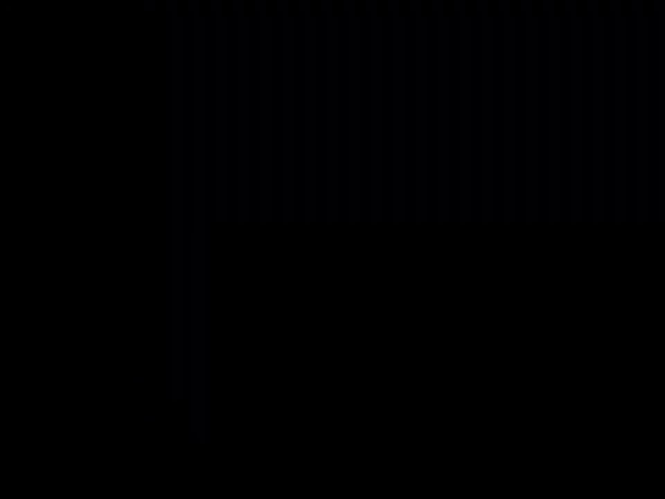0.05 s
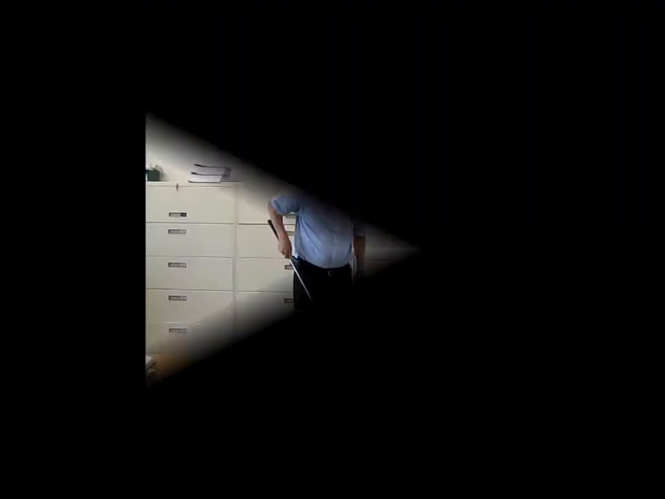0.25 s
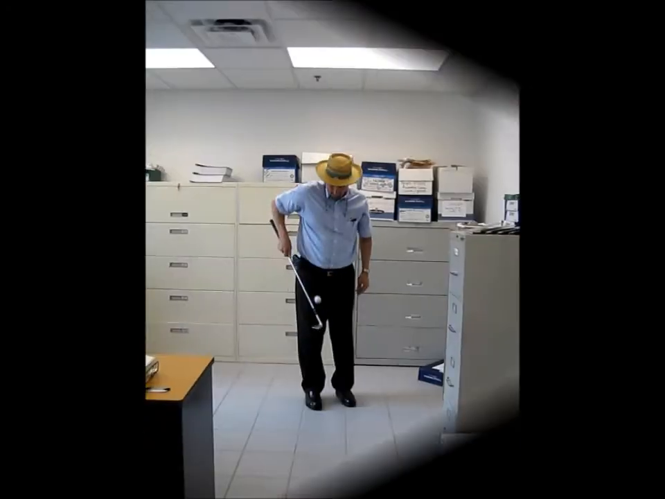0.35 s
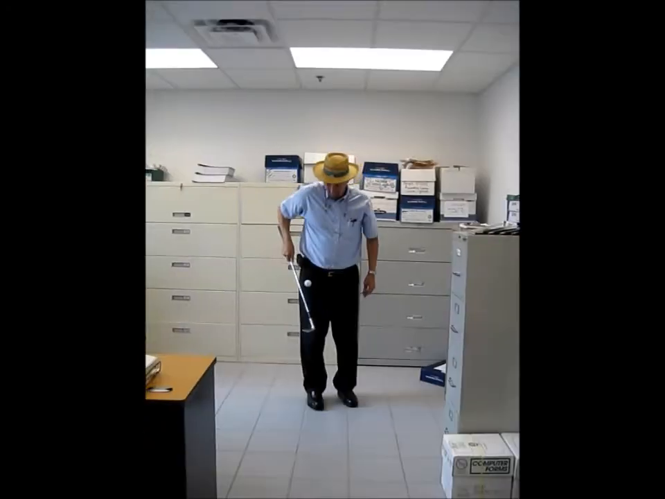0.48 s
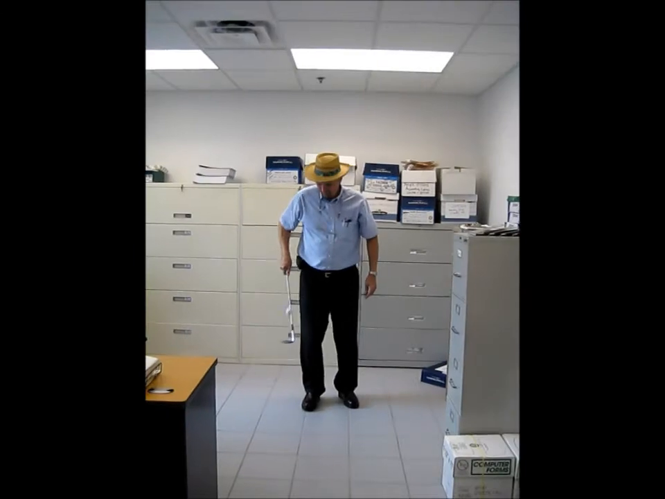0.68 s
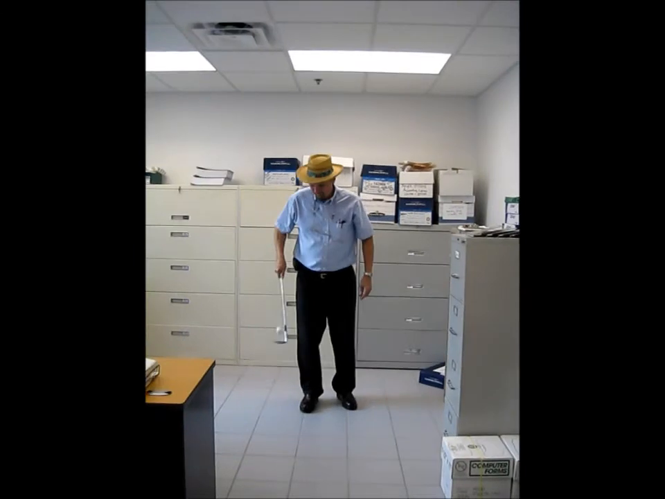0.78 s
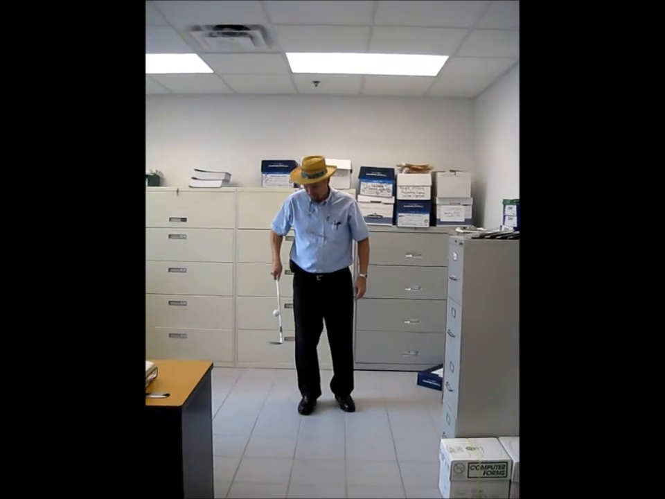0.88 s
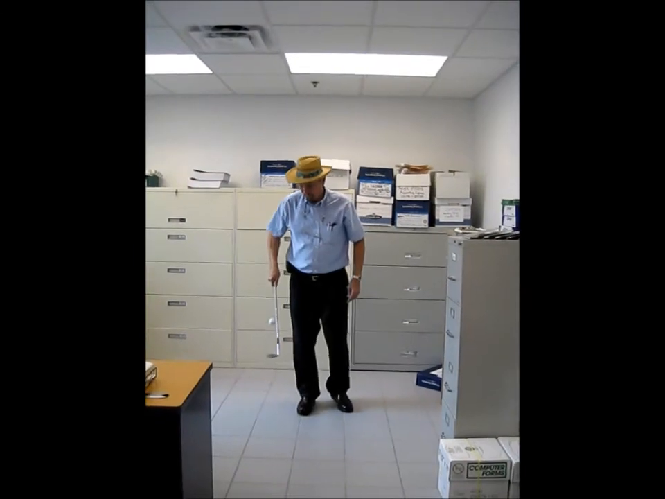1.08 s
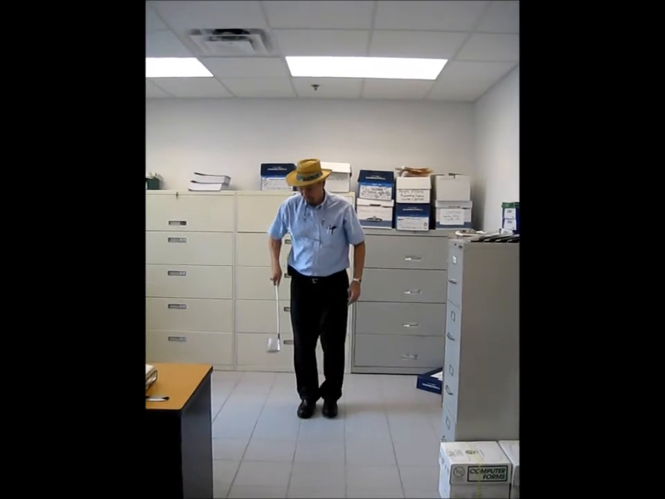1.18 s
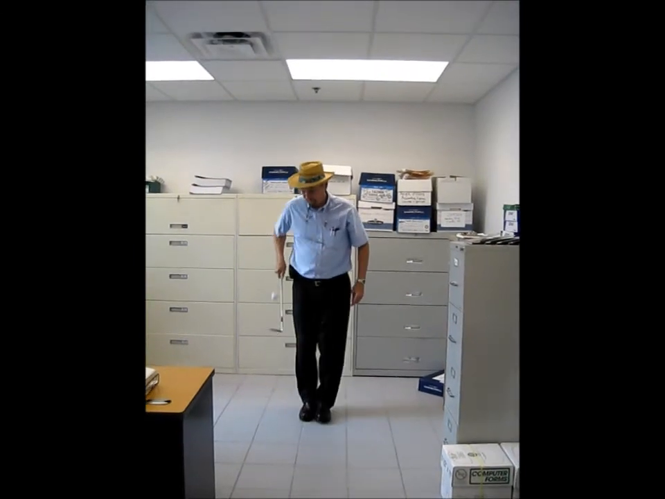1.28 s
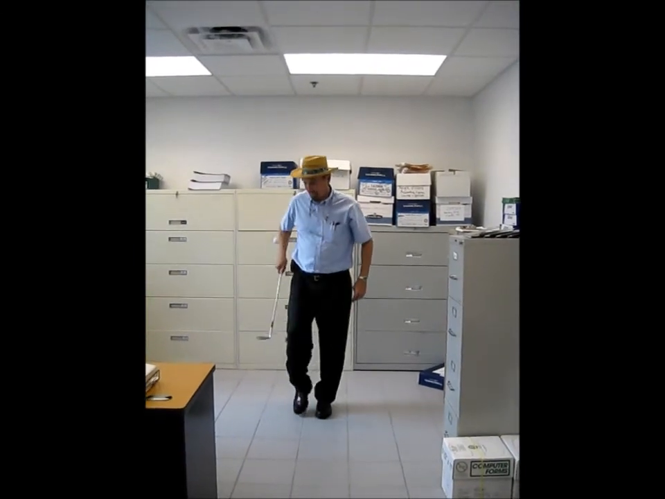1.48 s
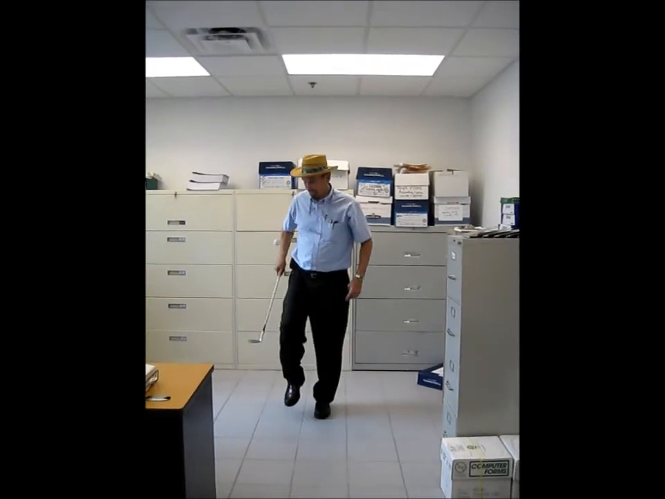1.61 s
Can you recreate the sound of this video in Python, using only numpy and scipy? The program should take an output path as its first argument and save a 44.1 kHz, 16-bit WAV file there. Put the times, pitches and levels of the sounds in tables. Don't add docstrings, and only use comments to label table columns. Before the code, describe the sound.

Three sharp clicks of a golf ball tapped on an iron club in a tiled office

```python
import sys
import numpy as np
from scipy import signal
from scipy.fft import rfft, irfft, next_fast_len
from scipy.io import wavfile
from scipy.ndimage import uniform_filter1d

SR = 44100
rng = np.random.default_rng(int(sys.argv[2]) if len(sys.argv) > 2 else 0)


def attenuation_scalar(level_db):
    decades = np.asarray(level_db, float) / 20
    return 10 ** decades


def unload_audio(sound):
    columns = np.transpose(np.atleast_2d(sound))
    steps = np.round(np.clip(columns, -1, 1) * 32767)
    wavfile.write(sys.argv[1], SR, steps.astype(np.int16))


N = 72765
T = np.arange(N) / SR


def unit(x):
    return x / np.sqrt(np.mean(x ** 2))


def shape(x, gain):
    size = next_fast_len(len(x) + 4096)
    hz = np.maximum(np.arange(size // 2 + 1) * SR / size, 1)
    return irfft(rfft(x, size) * gain(hz), size)[:len(x)]


def read(table, hz):
    points = np.array(table)
    return np.interp(np.log(hz), np.log(points[:, 0]), points[:, 1])


def band(x, hz, width_hz):
    return signal.lfilter(*signal.iirpeak(hz, hz / width_hz, fs=SR), x)


def walk(rate_hz):
    k = int(SR / rate_hz)
    steps = np.repeat(rng.standard_normal(N // k + 1), k)
    return 1.05 * uniform_filter1d(uniform_filter1d(steps, k), k)[:N]


def ring(modes, t):
    on = np.maximum(t, 0)
    return sum(attenuation_scalar(db - 60 * on / t60) * np.sin(2 * np.pi * hz * on) for hz, db, t60 in modes)


# (time [s], body level [dB], click level [dB], club share of the ring [0-1])
TAPS = [
    (0.2538, -20, -7, 1),
    (0.7502, -19, -12.5, 0.07),
    (1.1682, -20, -2.5, 0),
]
# (frequency [Hz], level [dB], t60 [s])
BALL_MODES = [(700, -15, .015), (1096, -7, 0.048), (1355, -5, 0.018), (1670, -1, 0.0099),
              (1917, -3.5, 0.0092), (2330, -11, 0.012), (2906, -2.5, .012), (3045, -8, 0.011),
              (3700, -4, 0.0022), (4570, -0.5, 0.0062), (5490, -7.5, .008), (6430, -4, 0.011),
              (7340, -4.5, 0.014)]
# (frequency [Hz], level [dB], t60 [s])
CLUB_MODES = [(1015, -8.5, 0.0069), (1190, -4, 0.011), (1625, -4, 0.032), (1775, -12, 0.058),
              (2226, -4.5, 0.0089), (2860, -6.5, 0.02), (3970, -8.5, 0.031), (5010, -3, 0.029),
              (6340, 2, 0.0065), (6840, -25, 0.0043), (10440, -14, 0.017), (12500, -18, .012)]


def taps():
    click_hz, click_width_hz = 12100, 12900
    contact_s, thin_hz = 0.00021, 390
    out = np.zeros(N)
    for s, body_db, click_db, club in TAPS:
        t = T - s
        impulse = np.sinc(t * SR)
        click = band(band(impulse, click_hz, click_width_hz), click_hz, click_width_hz)
        body = club * ring(CLUB_MODES, t) + (1 - club) * ring(BALL_MODES, t)
        contact = np.clip(t / contact_s, 0, 1)
        out += attenuation_scalar(click_db) * 2 * click + attenuation_scalar(body_db) * body * contact
    return shape(out, lambda f: (1j * f / (1j * f + thin_hz)) ** 2)


# (time [s], pitch [Hz], level [dB], t60 [s])
TICKS = [
    (1.29, 3600, -13, .0013),
    (.9865, 2800, -30, .0015),
]


def ticks():
    knocks = sum(ring([(hz, db, t60)], T - s) for s, hz, db, t60 in TICKS)
    return band(knocks, 4300, 6000)


# (start [s], rise [s], fall [s], level [dB], tilt [dB per octave])
SCUFFS = [
    (0.228, 0.027, 0.021, -25, 2.5),
    (0.481, 0.044, 0.023, -37, -2),
    (.568, 0.012, 0.015, -39.5, 0),
    (1.06, 0.014, 0.019, -46, -3),
]
# (start [s], rise [s], fall [s], level [dB], tilt [dB
SHUFFLES = [
    (.155, .01, 0.066, -42, 10),
    (1.2, 0.11, 0.11, -47.5, -9),
]
# (frequency [Hz], density [dB per Hz])
RUB_COLOUR = [(800, -9.5), (2000, -14), (3500, -1), (6000, -2.5), (10000, -3.5), (15500, -12)]


def scuffs(rows):
    out = np.zeros(N)
    for s, rise, fall, db, tilt_db in rows:
        def colour(f):
            tilt = tilt_db * np.log2(np.maximum(f, 600) / 4000)
            return attenuation_scalar(read(RUB_COLOUR, f) + tilt) * np.minimum(f / 400, 1)

        grain = rng.standard_normal(N) * attenuation_scalar(2.8 * walk(300))
        rub = unit(shape(grain, colour))
        swell = np.clip((T - s) / rise, 0, 1) ** 0.59
        fade = np.exp(-np.maximum(T - s - rise, 0) / fall)
        out += attenuation_scalar(db) * swell * fade * rub
    return out


# (delay [s], level [dB])
ECHOES = [(.0033, -2), (.0057, -8), (.0086, -5), (.0139, -10), (.018, -10)]
# (frequency [Hz], t60 [s])
ROOM_T60 = [(500, 0.54), (1200, 0.32), (3000, 0.32), (6000, 0.36), (12000, 0.22)]


def office(x):
    room_db, build_s = -33, 0.0013
    t = T[:SR // 2]
    tail = 0
    for hz in 400 * 2 ** np.arange(0, 5.6, .5):
        noise = rng.standard_normal(len(t))
        diffuse = unit(band(band(noise, hz, hz / 2), hz, hz / 2))
        tail = tail + attenuation_scalar(-60 * t / read(ROOM_T60, hz)) * diffuse * np.sqrt(hz / 8000)
    response = attenuation_scalar(room_db) * tail * (1 - np.exp(-t / build_s))
    response[0] = 1
    for lag, db in ECHOES:
        response[int(lag * SR)] += attenuation_scalar(db)
    return signal.fftconvolve(x, response)[:N]


# (frequency [Hz], density [dB per Hz])
VENT_COLOUR = [(25, -7), (57, -4.5), (110, -4), (240, -5.5), (900, -5.5), (2200, -8), (6000, -12.5),
               (15500, -24)]
# (frequency [Hz], width [Hz], level [dB])
DUCT = [(312.7, 19.5, -59), (383.5, 21, -51.5), (480, 56, -53.5), (515.4, 36, -52.5), (601, 20, -60),
        (1225, 440, -53), (13600, 250, -76)]


def vent():
    flow = attenuation_scalar(-45 + 1.23 * walk(7.03))
    air = flow * unit(shape(rng.standard_normal(N), lambda f: attenuation_scalar(read(VENT_COLOUR, f))))
    for hz, width_hz, db in DUCT:
        waver = attenuation_scalar(db + 1.64 * walk(9.2))
        air = air + waver * unit(band(rng.standard_normal(N), hz, width_hz))
    return air


def scene():
    rub, knock = scuffs(SCUFFS), ticks()
    wet = attenuation_scalar(-10) * knock + 0.25 * rub
    struck = office(taps() + wet) - wet
    return (struck + rub + knock + vent() + scuffs(SHUFFLES))[None]


def top_cut(x):
    return signal.sosfilt(signal.butter(12, 17090, fs=SR, output="sos"), x)


def record(dry):
    notch_hz = 7900
    capsule_hz, capsule_width_hz, capsule_db = 8300, 1590, 8.5
    top_hz, peak_top_hz = 15800, 17000
    start_s, start_db, settle_s = .165, 1, .02

    def microphone(f):
        ports = np.cos(np.pi * f / notch_hz / 2)
        return ports * attenuation_scalar(capsule_db / (1 + ((f - capsule_hz) / capsule_width_hz) ** 2))

    def top_band(f):
        return np.clip((f - top_hz) / 80. + 1, 0, 1) * np.clip((peak_top_hz - f) / 970.0, 0, 1) ** 2

    x = shape(dry[0], microphone)
    low = shape(x, lambda f: np.clip((top_hz - f) / 80., 0, 1))
    top = shape(x, top_band)
    loud = sum(np.exp(-((T - row[0]) / 0.0028) ** 2) for row in TAPS)
    settle = attenuation_scalar(start_db * np.exp(-np.abs(T - start_s) / settle_s))
    gain = np.clip((T - start_s) / 0.00043, 0, 1) * settle
    mix = shape((low + loud * top) * gain, lambda f: np.clip((peak_top_hz - f) / 200., 0, 1))
    return top_cut(mix[None])


dry = scene()
out = record(dry)
unload_audio(out)
```